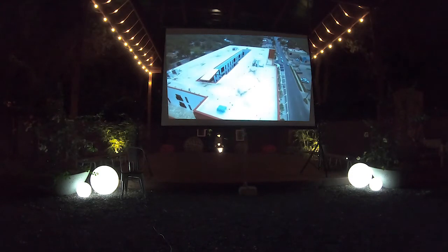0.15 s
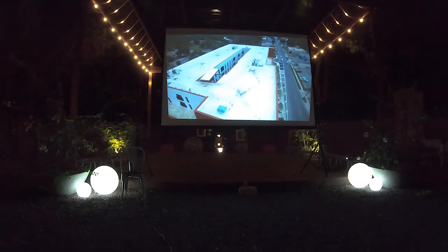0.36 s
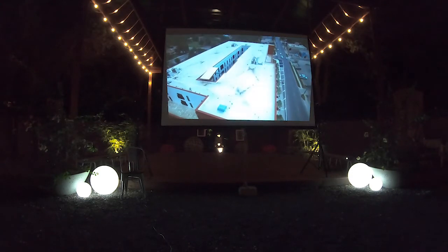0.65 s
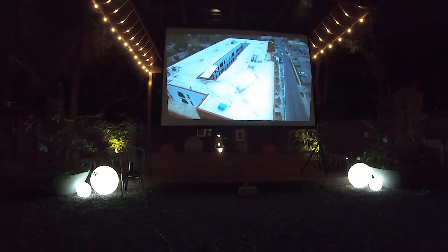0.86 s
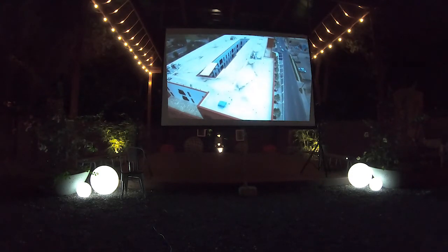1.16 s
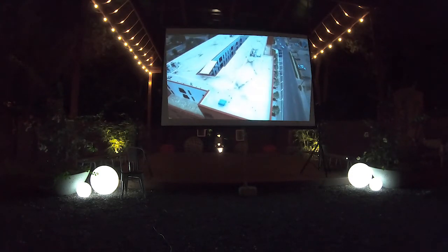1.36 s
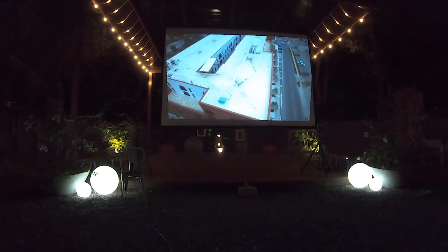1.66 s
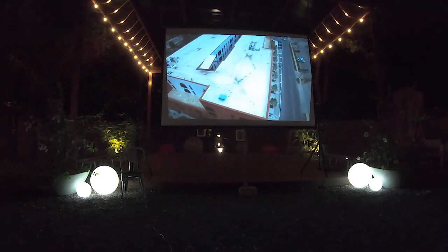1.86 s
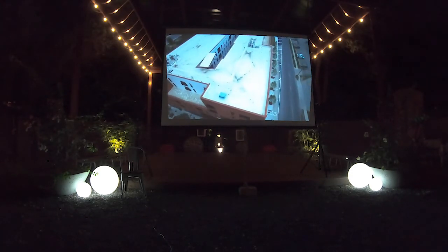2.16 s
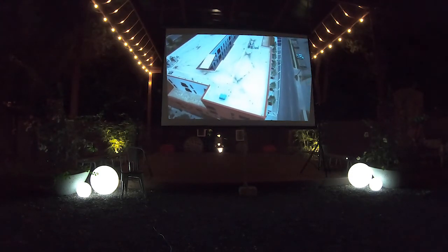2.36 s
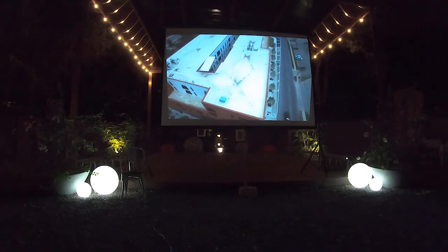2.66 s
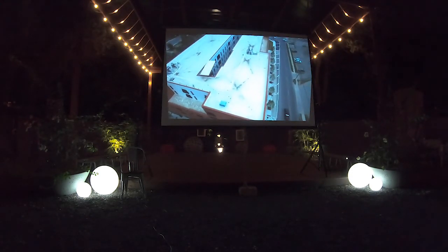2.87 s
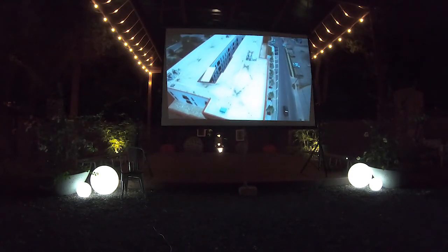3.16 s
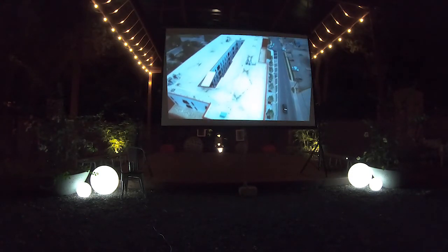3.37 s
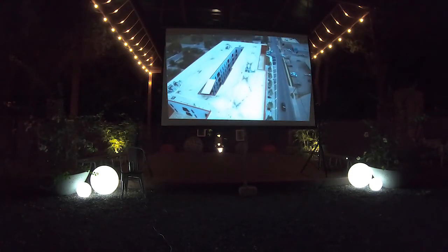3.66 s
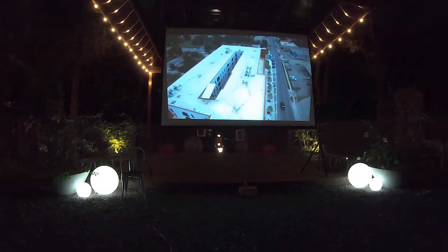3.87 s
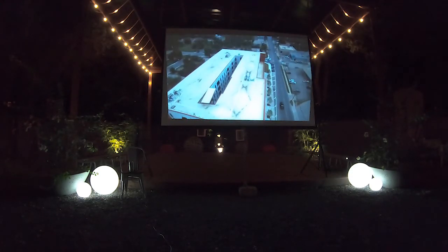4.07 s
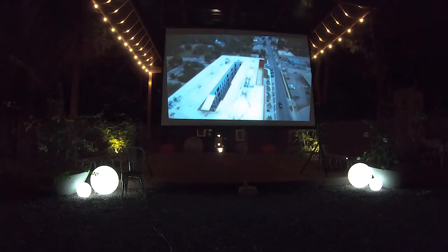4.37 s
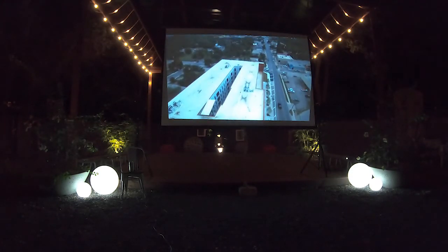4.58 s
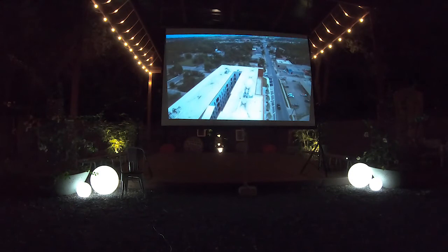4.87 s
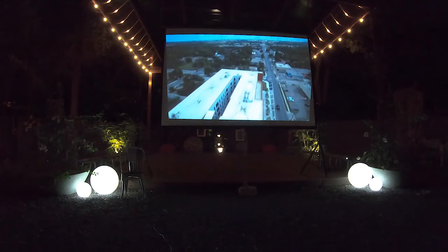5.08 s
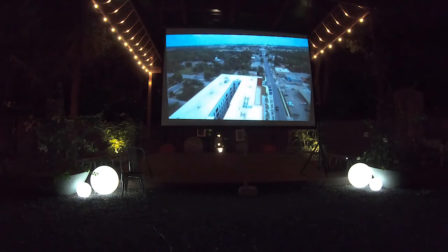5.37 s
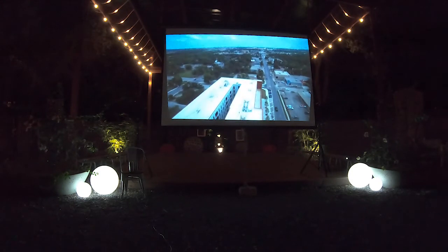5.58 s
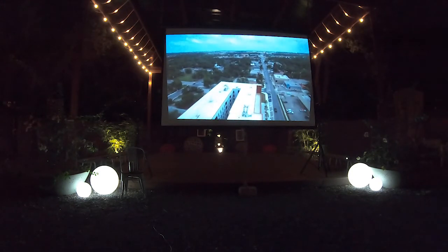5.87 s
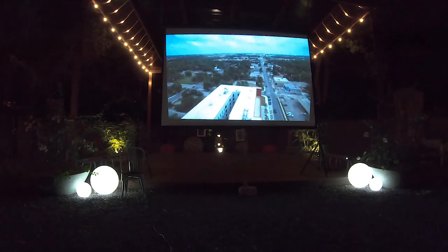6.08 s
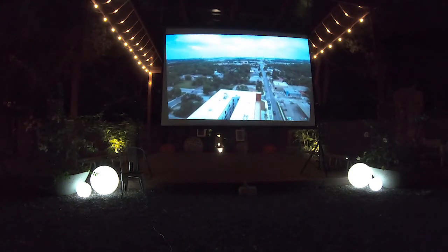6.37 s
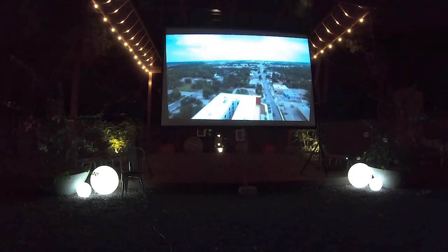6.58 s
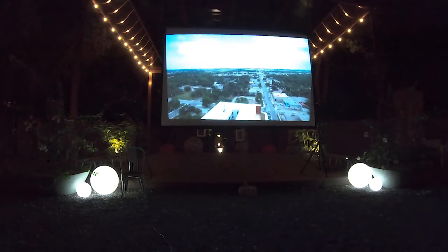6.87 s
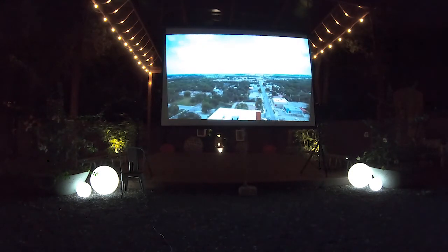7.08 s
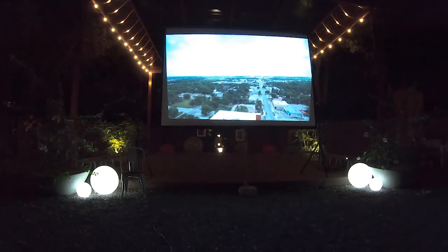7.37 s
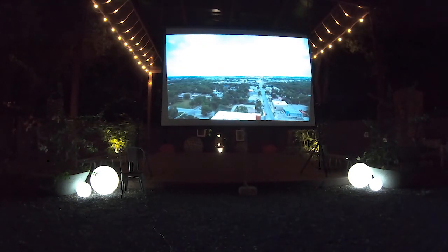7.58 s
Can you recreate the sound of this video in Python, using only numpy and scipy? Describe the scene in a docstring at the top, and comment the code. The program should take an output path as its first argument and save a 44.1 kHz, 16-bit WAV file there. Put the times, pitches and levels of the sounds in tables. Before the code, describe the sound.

For about 7.7 seconds, a night courtyard is filled with a dense chorus of tree crickets. Their shrill, finely buzzing tones, around 3 kHz, swell together almost three times a second, dipping clearly between crests but never falling silent. A much fainter single cricket trills slightly higher, wavering subtly and faltering briefly near 4.8 seconds. Thin, steady insect hiss lies far above. Underneath is a soft, distant bed of traffic: muffled tyre roar drifting slightly, low rumble and the far roar of a town. A low drone surges gently around 3.3 to 3.9 seconds, more noticeably from 4.4 to 5.2, then weakly afterwards. A vague engine note wanders low, becomes clearer near 6.6 seconds and climbs toward the end. An almost inaudible mains hum and light air and microphone hiss complete the diffuse outdoor sound.

```python
"""A courtyard at night. A chorus of tree crickets, summed trains of short tones, swells in step almost three
times a second near 3 kHz; one cricket trills a little higher as a tone that keeps step between wing strokes.
Faint insects hiss in narrow noise bands far up. Distant traffic lies below: shaped noise gives tyre roar,
a low rumble, a low drone that surges briefly and the far town; a gliding sine gives an engine note that wanders
and finally climbs. Mains equipment hums faintly as a sine, under noise for night air and microphone hiss."""
import sys
import numpy as np
from scipy import signal
from scipy.fft import rfft, irfft, next_fast_len
from scipy.io import wavfile

SR = 44100
rng = np.random.default_rng(int(sys.argv[2]) if len(sys.argv) > 2 else 0)


def field_ratio(decibels):
    """Amplitude ratio for a level in dB (20 dB per decade); scalars and array-likes work."""
    return 10 ** (np.asarray(decibels, dtype=float) / 20)


def unload_wav(signal):
    """Save mono or channel-first audio to the path in sys.argv[1] as 16-bit WAV at rate SR, clipped to [-1, 1]."""
    wavfile.write(
        sys.argv[1],
        SR,
        np.round(np.clip(np.atleast_2d(signal).T, -1, 1) * 32767).astype(np.int16),
    )


N = 340452   # length in samples


def rms_one(x):
    """Normalisation: scale to unit rms."""
    return x / np.sqrt(np.mean(x ** 2) + 1e-20)


def in_time(rows):
    """Linear interpolation: each column of a time table as one value per sample."""
    s, *columns = np.transpose(rows)
    return [np.interp(np.arange(N) / SR, s, c) for c in columns]


def bumps(centres_s, heights_db, widths_s):
    """Superposition of Gaussian changes of level in time."""
    s = np.arange(N) / SR
    rows = np.broadcast(centres_s, heights_db, widths_s)
    return sum(db * np.exp(-.5 * ((s - centre) / width) ** 2) for centre, db, width in rows)


def drift(rate_hz):
    """Low-passed random fluctuation of unit rms: coarse noise through a double pole."""
    coarse = 40   # samples per noise value
    r = np.exp(-2 * np.pi * rate_hz * coarse / SR)
    noise = rng.standard_normal(N // coarse + 2002)
    slow = signal.lfilter([1], [1, -2 * r, r * r], noise)[2000:]   # drop the filter's run-in
    return np.interp(np.arange(N) / coarse, np.arange(len(slow)), rms_one(slow))


def coloured_noise(spectrum):
    """Spectral shaping: white noise weighted by a spectral density, unit rms."""
    size = next_fast_len(N)
    hz, level_db = np.transpose(spectrum)
    log_hz = np.log(np.arange(size // 2 + 1) * SR / size + 1)
    gain = field_ratio(np.interp(log_hz, np.log(hz), level_db, left=-120, right=-120))
    white = rfft(rng.standard_normal(size))
    return rms_one(irfft(white * gain, size)[:N])


def noise_band(hz, width_hz):
    """Resonance: white noise twice through one resonator, unit rms."""
    r = np.exp(-np.pi * width_hz / SR)
    section = [1, 0, -1, 1, -2 * r * np.cos(2 * np.pi * hz / SR), r * r]
    return rms_one(signal.sosfilt([section, section], rng.standard_normal(N)))


def wing_strokes(per_s, duty):
    """Stridulation: place within each stroke (0-1), stroke number, and a smooth hump while the wings close."""
    turns = np.cumsum(per_s / SR + np.zeros(N)) + rng.random()
    place = turns % 1
    hump = np.sin(np.pi * np.minimum(place / duty, 1)) ** 2
    return place, turns.astype(int), hump


def swell_db(crest_s, crest_db, lull_db, lead_s):
    """Amplitude modulation: level on a cosine from the lull to each crest and back."""
    fullness = 0.93   # below 1 the crests broaden
    s = np.arange(N) / SR + lead_s
    crest_number = np.interp(s, crest_s, np.arange(len(crest_s)))
    height = np.abs(np.cos(np.pi * crest_number)) ** (2 * fullness)
    return lull_db + height * (np.interp(s, crest_s, crest_db) - lull_db)


# Crests of the chorus's swells: t/s, level/dB, octave overtone level/dB
CHORUS_CRESTS = [(-.05, -30, -59), (.315, -25.5, -57), (.67, -27.5, -59.5), (1.075, -27.5, -59),
                 (1.43, -26.5, -59), (1.8, -27, -58), (2.17, -26, -56), (2.535, -27.5, -59.5),
                 (2.92, -27.5, -58), (3.28, -27.5, -59.5), (3.645, -27.5, -56), (4.02, -26, -58),
                 (4.375, -26.5, -60), (4.79, -27.5, -59), (5.16, -26.5, -57), (5.5, -26, -58),
                 (5.895, -27, -59), (6.245, -27.5, -59), (6.615, -27.5, -58), (6.985, -25, -59),
                 (7.35, -27.5, -58), (7.73, -26, -58), (8.1, -27, -59)]


def chorus(count, duty, glide_hz, blur_db):
    """Incoherent superposition: many crickets' trains of short falling tones, each stroke at a random phase."""
    centre_hz, spread_hz, strokes_per_s = 2977.5, 50, 52
    crest_s, crest_db, octave_crest_db = np.transpose(CHORUS_CRESTS)
    level_db = swell_db(crest_s, crest_db, lull_db=-35, lead_s=0)
    octave_db = swell_db(crest_s, octave_crest_db, lull_db=-68, lead_s=0.018)   # crests a little early
    rank = (np.arange(count) + .5) / count - .5
    pitches = centre_hz - spread_hz * np.sign(rank) * np.log(1 - 2 * abs(rank))   # most sing near the middle
    tone, octave = np.zeros(N), np.zeros(N)
    for hz in pitches:
        own_rate = strokes_per_s * (1 + .08 * rng.standard_normal())
        place, stroke, hump = wing_strokes(own_rate, duty)
        start_turn = rng.random(1000)
        gliding_hz = hz - glide_hz * (place / duty - .5)
        phase = 2 * np.pi * (np.cumsum(gliding_hz) / SR + start_turn[stroke])
        tone += hump * np.sin(phase)
        octave += hump * np.sin(2.025 * phase)   # the overtone sits slightly sharp
    blur = field_ratio(blur_db) * noise_band(centre_hz, 250)   # far singers merge into a blur
    return field_ratio(level_db) * rms_one(rms_one(tone) + blur) + field_ratio(octave_db) * rms_one(octave)


# Spells in which the triller sits slightly lower: start t/s, end t/s
TRILL_LOW_SPELLS = [(.55, 1.05), (1.7, 3.25), (5.35, 6.5)]


def trill_pitch():
    """Frequency modulation: the high pitch slides down for each low spell and back up."""
    high_hz, sag_hz, slide_s = 3773, 14, .08
    s = np.arange(N) / SR
    low = sum(np.clip(.5 + np.minimum(s - a, b - s) / slide_s, 0, 1) for a, b in TRILL_LOW_SPELLS)
    return high_hz - sag_hz * low


# Brief swells and falters of the triller: t/s, change of level/dB
TRILL_LEVEL_TURNS = [(.35, 1), (.95, 0.5), (1.13, -4), (1.43, 4), (1.66, -4), (3.4, 2), (4.16, 3),
                     (4.77, -14), (7.62, 4)]


def trill(duty, start_hz, fall_hz, waver_hz, echo_db):
    """Coherent pulsing: one cricket's tone stays in step between strokes, so a comb of lines forms."""
    base_db, turn_s, strokes_per_s = -53, 0.069, 75.4
    wall_echo_s = 25 / 3767
    level_db = base_db + bumps(*np.transpose(TRILL_LEVEL_TURNS), turn_s)
    place, _, hump = wing_strokes(strokes_per_s + .5 * drift(2.1), duty)
    done = place / duty
    # each stroke starts a little sharp and falls ever faster; the bend is in cycles
    bend = (start_hz * done - fall_hz * done ** 3 / 3) * duty / strokes_per_s
    wavering_hz = trill_pitch() + waver_hz * drift(9.8)
    phase = 2 * np.pi * (np.cumsum(wavering_hz) / SR + bend)
    direct = hump * np.sin(phase)
    # a wall returns each stroke half a stroke late, partly filling the gaps
    echo = np.roll(direct, round(wall_echo_s * SR)) * field_ratio(echo_db + 3 * drift(2.9))
    return field_ratio(level_db) * rms_one(direct + echo)


# Other trillers farther off: f/Hz, width f/Hz, level/dB
DISTANT_TRILLERS = [(3536, 440, -54.5), (3823, 180, -58.5)]
# Narrow bands of high insect hiss: f/Hz, width f/Hz, level/dB
HISSING_INSECTS = [(5270, 150, -75.5), (7030, 140, -75), (9340, 260, -72), (10300, 150, -73.5),
                   (12520, 170, -68.5), (12950, 300, -68), (13400, 300, -69), (14000, 250, -74)]


def far_insects():
    """Narrow-band noise: too far for single strokes, the insects merge into steady bands of hiss."""
    bands = [*DISTANT_TRILLERS, *HISSING_INSECTS]
    return sum(field_ratio(level_db) * noise_band(hz, width_hz) for hz, width_hz, level_db in bands)


# Nearness of the road traffic, as tyre roar: t/s, level/dB
ROAR_LEVEL = [(0, -37.5), (.5, -38.5), (1, -37.5), (1.65, -38), (2.4, -37.5), (3.9, -36.5), (4.4, -39),
              (5.1, -37), (5.7, -39), (6.1, -36.5), (6.9, -38.5), (7.72, -38)]
# Spectral density of the tyre roar: f/Hz, relative level per Hz/dB
ROAR_SPECTRUM = [(330, -31), (560, -15.5), (699, -8.5), (858, 0.5), (1300, -15), (1690, -22), (2860, -120)]
# Spectral density of the tyre hiss: f/Hz, relative level per Hz/dB
TYRE_HISS_SPECTRUM = [(740, -47), (1250, -2.5), (2150, -8), (2450, -15), (3180, -33), (5390, -120)]


def tyres():
    """Broadband noise: tyre roar that follows the traffic, and a slowly rising tyre hiss."""
    roar_db, = in_time(ROAR_LEVEL)
    hiss_db = -51 + 0.23 * np.arange(N) / SR   # rises 0.23 dB per second
    roar = field_ratio(roar_db) * coloured_noise(ROAR_SPECTRUM)
    return roar + field_ratio(hiss_db) * coloured_noise(TYRE_HISS_SPECTRUM)


# The engine note: t/s, f/Hz, level/dB
ENGINE_NOTE = [(0, 104, -54), (.8, 118, -45), (1.6, 112, -48.5), (2.4, 96, -48), (2.8, 96, -58),
               (3.4, 113, -49.5), (4.5, 107, -53), (5.3, 104, -58), (6.1, 102, -58), (6.6, 114, -39.5),
               (6.9, 123, -45.5), (7.72, 138, -39)]


def engine():
    """Phase integration: a sine of gliding, slightly unsteady frequency."""
    hz, level_db = in_time(ENGINE_NOTE)
    unsteady_hz = hz + 0.74 * drift(3.4)
    return field_ratio(level_db) * np.sqrt(2) * np.sin(2 * np.pi * np.cumsum(unsteady_hz) / SR)


# Brief surges of the low drone: t/s, level above the faint drone/dB, Gaussian half length t/s
DRONE_SURGES = [(3.3, 13, 0.38), (3.9, 13, 0.18), (4.467, 22, .16), (4.85, 21.5, .14), (5.175, 21, .15),
                (5.897, 15, .2), (6.55, 13, 0.18), (7.6, 11, 0.25)]
# Spectral density of the drone: f/Hz, relative level per Hz/dB
DRONE_SPECTRUM = [(55, -45), (85, -15), (105, -3), (140, -1), (165, -9), (230, -18.5), (330, -46)]


def drone():
    """Amplitude-modulated noise: a faint low drone that surges briefly."""
    level_db = -60.5 + bumps(*np.transpose(DRONE_SURGES))
    return field_ratio(level_db) * coloured_noise(DRONE_SPECTRUM)


# Spectral density of the traffic rumble: f/Hz, relative level per Hz/dB
RUMBLE_SPECTRUM = [(41, -53), (70, -11.5), (97, -2.5), (119, 2), (260, -13.5), (340, -44), (570, -120)]


def rumble():
    """Stationary low-frequency noise: the steady rumble of the traffic."""
    return field_ratio(-45.5) * coloured_noise(RUMBLE_SPECTRUM)


# Spectral density of the far roar of the town: f/Hz, relative level per Hz/dB
TOWN_SPECTRUM = [(15, -32), (30, -29), (45, -20), (55, -19), (80, -7), (200, 2.5), (330, -0.5), (480, -1),
                 (620, -2.5), (800, -28)]


def town_roar():
    """Diffuse stationary noise: the steady far roar of the town."""
    return field_ratio(-47.5) * coloured_noise(TOWN_SPECTRUM)


def mains_hum():
    """Pure tone: a faint steady hum from electrical equipment."""
    hz, level_db = 60.4, -68.5
    return field_ratio(level_db) * np.sqrt(2) * np.sin(2 * np.pi * hz * np.arange(N) / SR)


# Spectral density of night air and microphone hiss: f/Hz, relative level per Hz/dB
HISS_SPECTRUM = [(1800, -47), (2400, -0.5), (3400, -2.5), (4300, -6.5), (5500, -6), (6600, -9), (8200, -11),
                 (9200, -8.5), (11000, -6.5), (13000, -11), (14500, -11), (16000, -12)]


def background_hiss():
    """Stationary broadband noise: night air and microphone hiss."""
    return field_ratio(-52.5) * coloured_noise(HISS_SPECTRUM)


def scene():
    """Linear superposition: all sources in one channel."""
    insects = chorus(count=40, duty=.75, glide_hz=90.65, blur_db=-7.0)
    insects = insects + trill(duty=0.98, start_hz=80.5, fall_hz=375, waver_hz=3.6, echo_db=-9.5)
    insects = insects + far_insects()
    traffic = tyres() + engine() + drone() + rumble() + town_roar()
    return (insects + traffic + mains_hum() + background_hiss())[None, :]


def roll_off(x):
    """The treble ends steeply here."""
    return signal.sosfilt(signal.butter(12, 16390, fs=SR, output="sos"), x)


def record(dry):
    """Elliptic low-pass filtering: the top is cut steeply above 15730 Hz."""
    cut = signal.ellip(14, .3, 60, 15730, fs=SR, output="sos")   # ripple and stop band in dB
    mix = signal.sosfilt(cut, dry)
    return roll_off(mix)


dry = scene()
out = record(dry)
unload_wav(out)
```